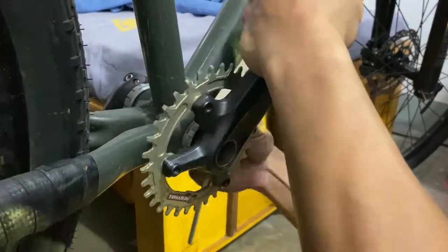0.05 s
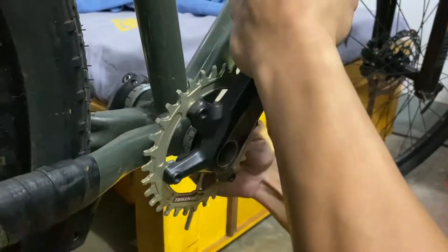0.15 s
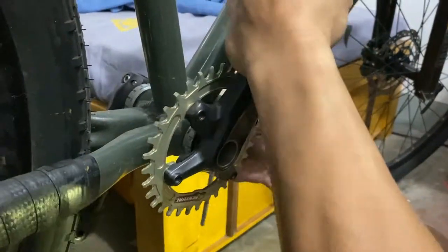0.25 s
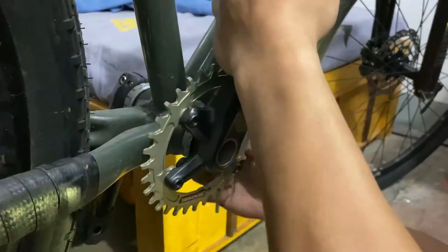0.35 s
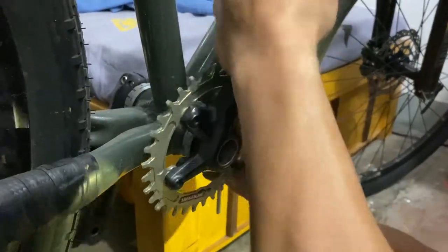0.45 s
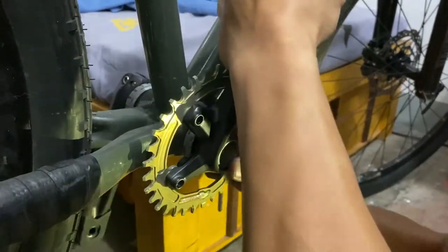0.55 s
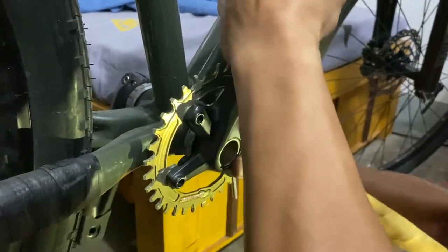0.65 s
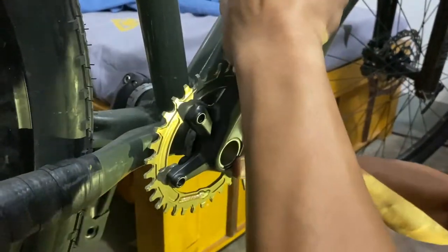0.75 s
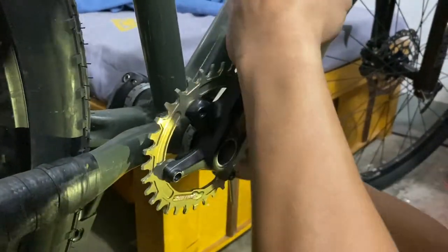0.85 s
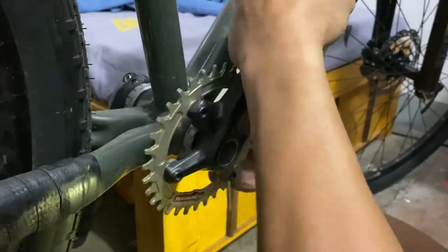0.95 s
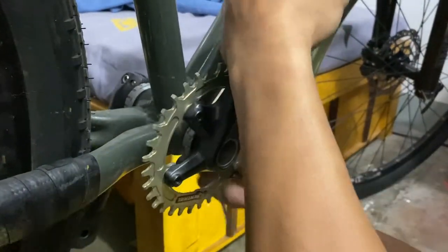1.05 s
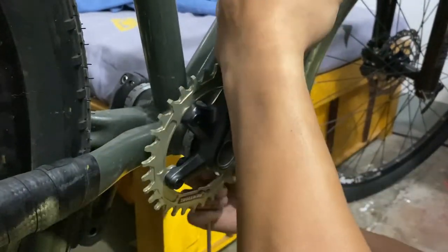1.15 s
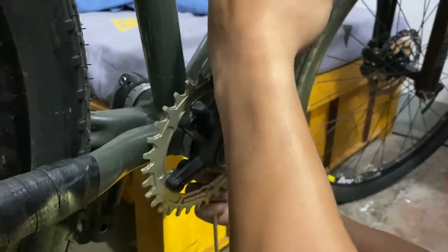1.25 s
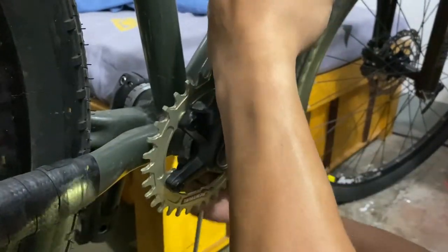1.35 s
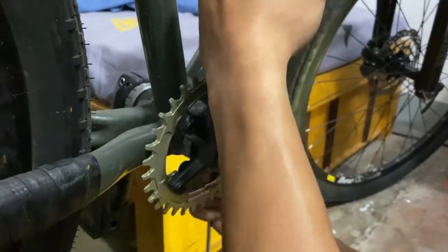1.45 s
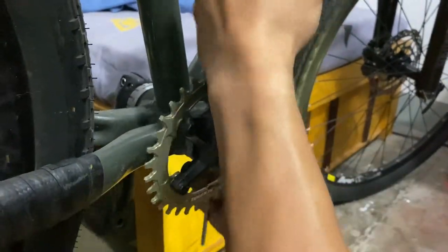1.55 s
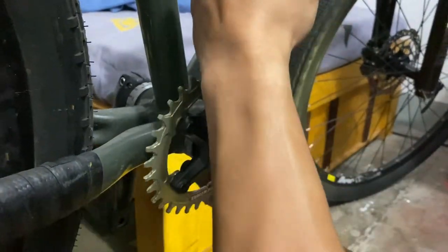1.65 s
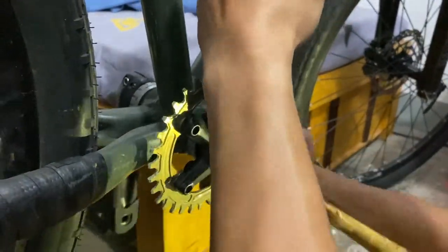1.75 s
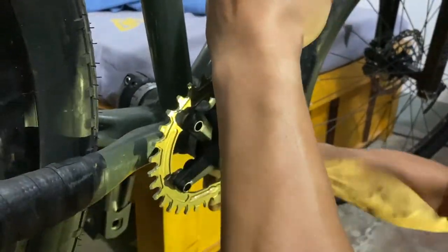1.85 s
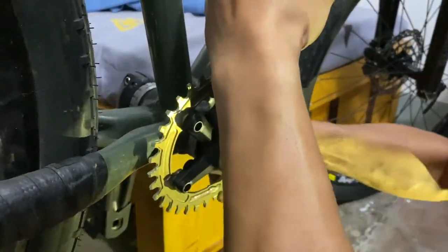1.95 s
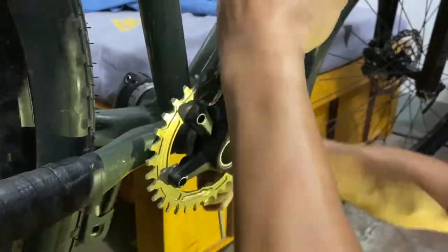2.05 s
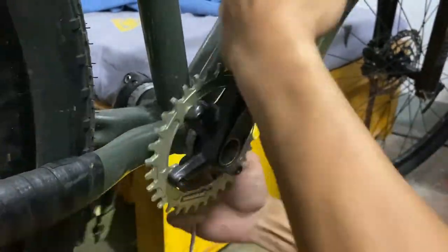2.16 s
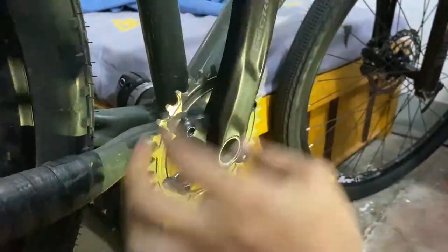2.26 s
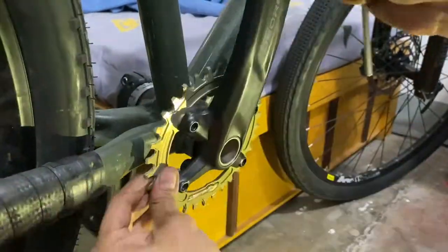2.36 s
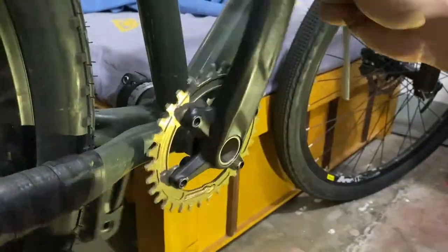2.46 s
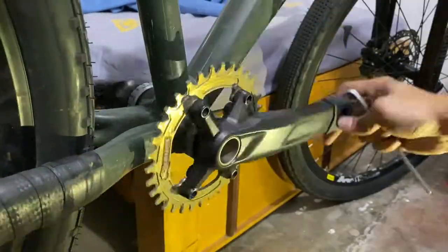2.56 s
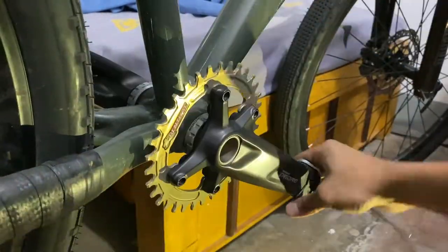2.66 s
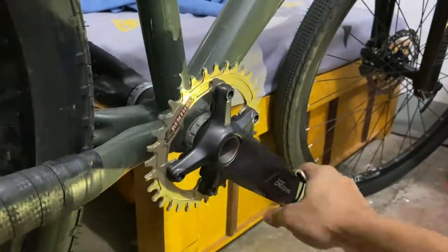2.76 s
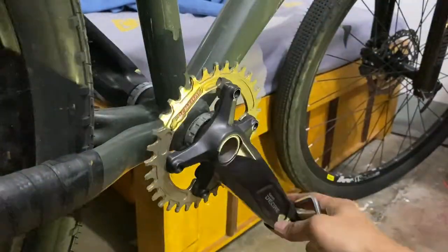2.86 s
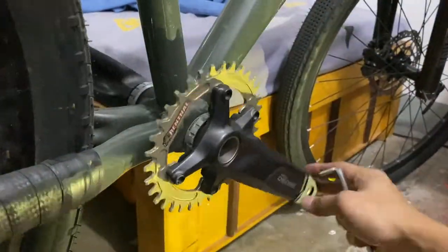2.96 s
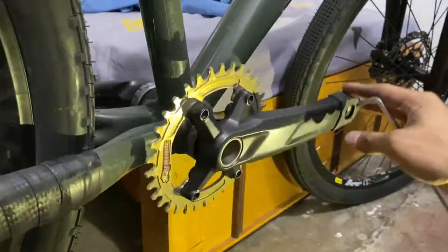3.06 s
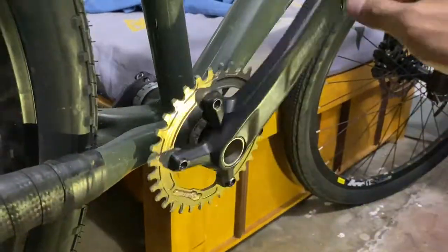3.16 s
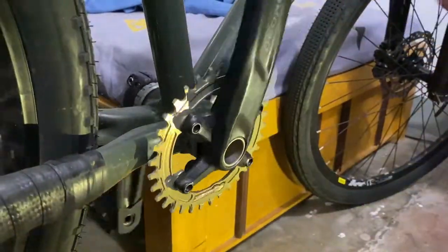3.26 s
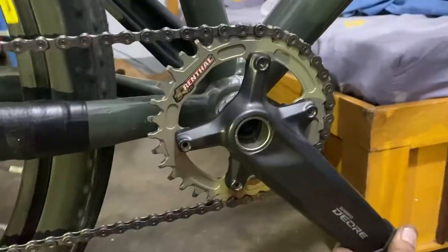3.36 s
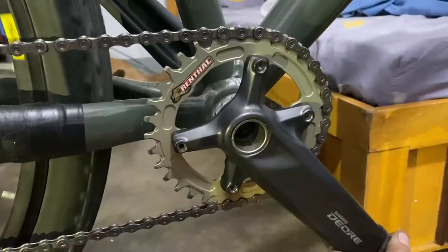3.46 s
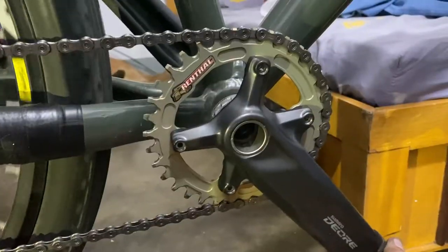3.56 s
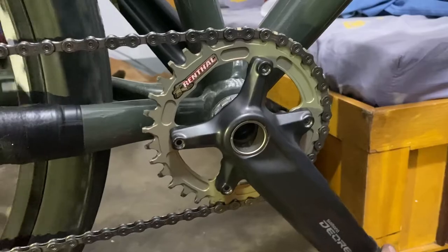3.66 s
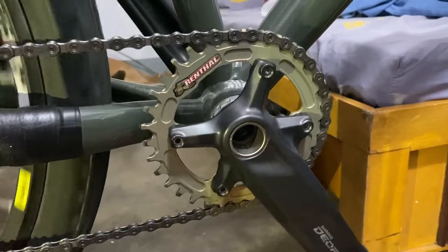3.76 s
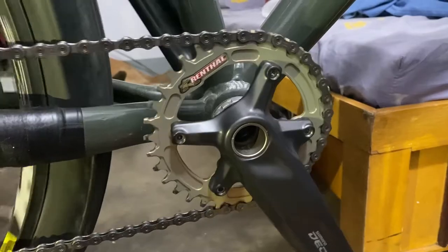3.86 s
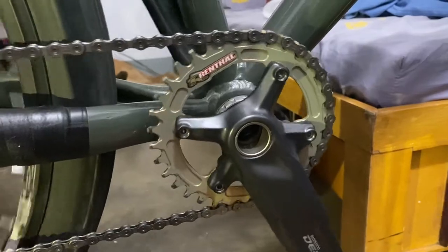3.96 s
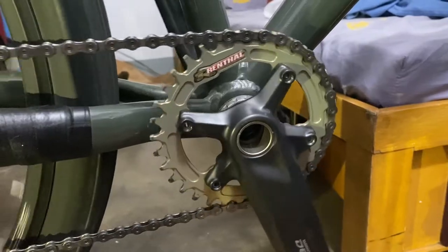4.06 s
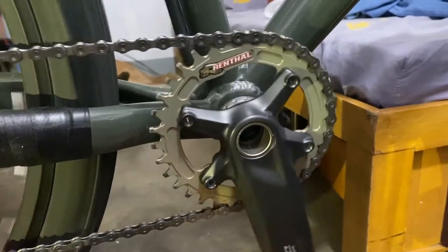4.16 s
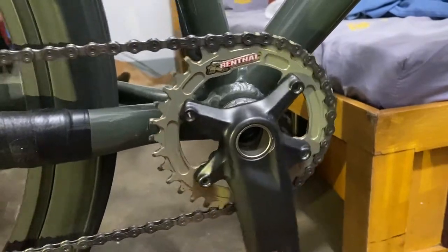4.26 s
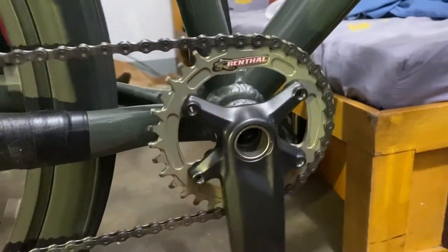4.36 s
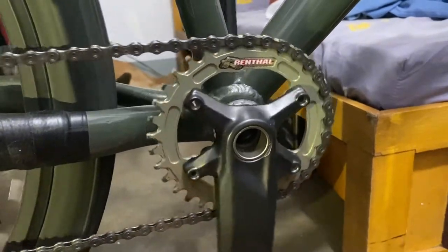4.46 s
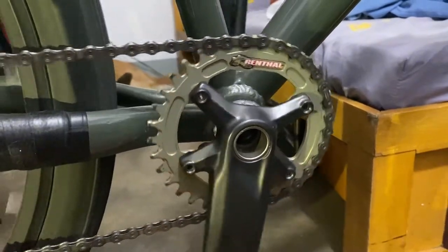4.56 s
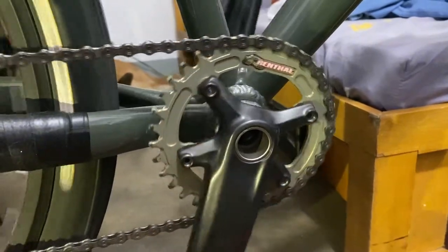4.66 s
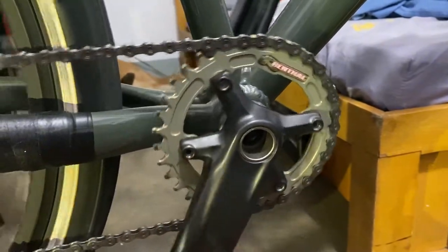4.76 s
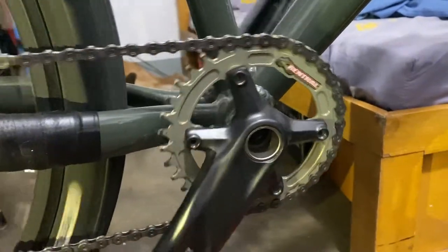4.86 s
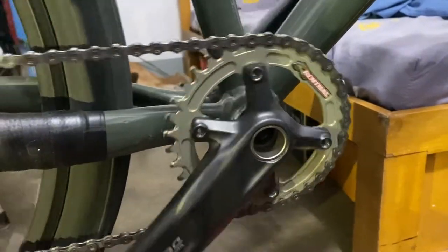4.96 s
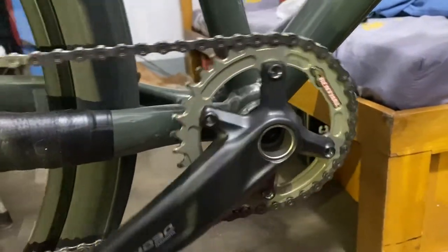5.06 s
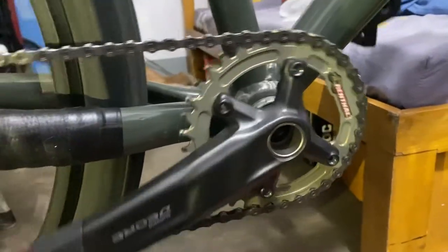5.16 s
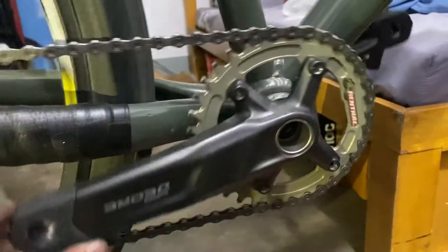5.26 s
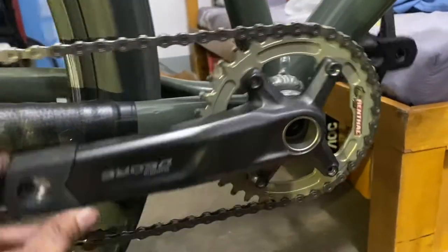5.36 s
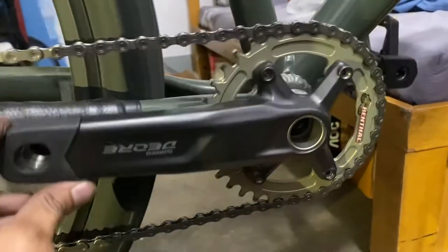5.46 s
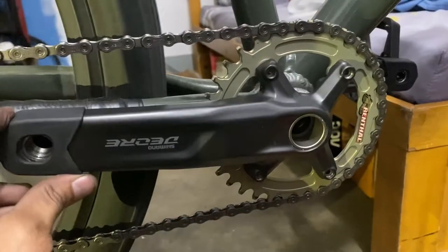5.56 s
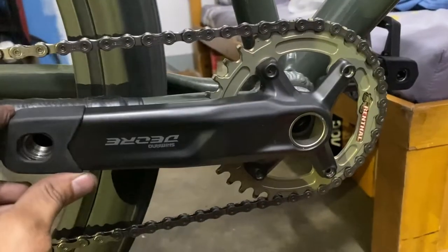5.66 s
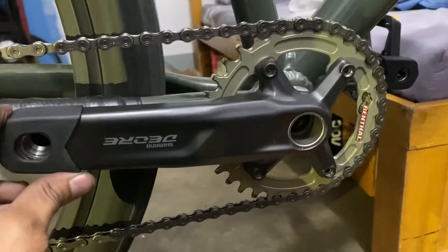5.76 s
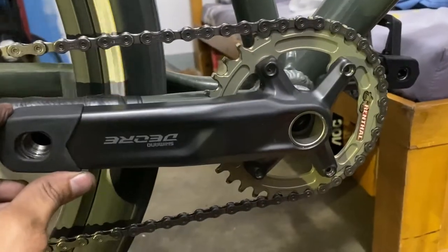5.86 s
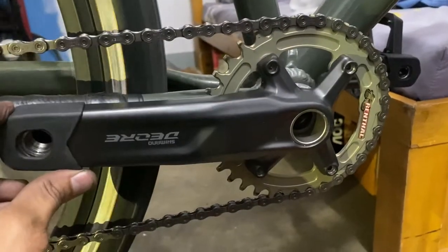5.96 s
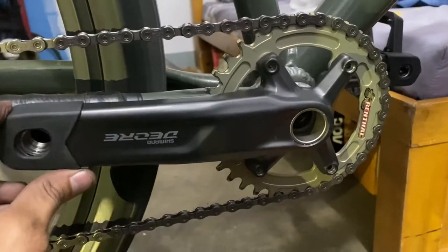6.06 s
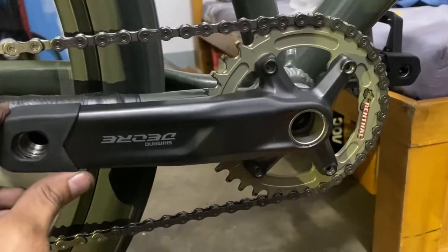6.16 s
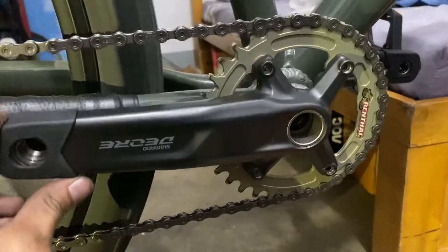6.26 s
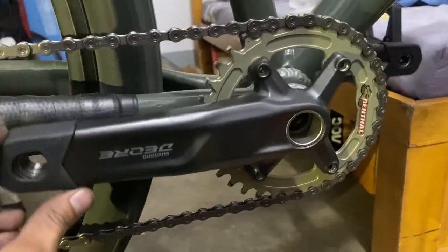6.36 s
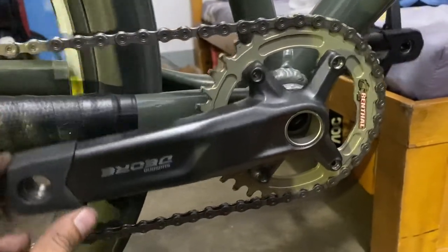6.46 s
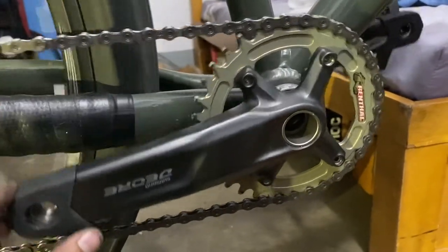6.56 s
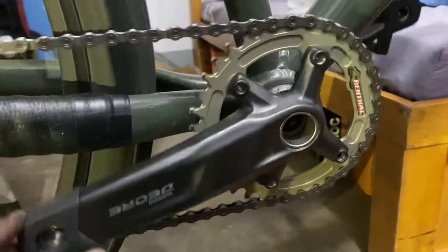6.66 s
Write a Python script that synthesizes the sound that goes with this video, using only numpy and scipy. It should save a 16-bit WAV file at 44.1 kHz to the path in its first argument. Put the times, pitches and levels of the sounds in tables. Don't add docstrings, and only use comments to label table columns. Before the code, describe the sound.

A close stereo pickup in a small, fairly dry room with thin fan hiss and faint tones. Light steel ticks come at 0.1 and 0.4-0.5 s, then a brighter, loud cluster of key knocks at 1.1-1.3 s. Smaller rattles and soft finger rubbing continue from 1.5 to 2.4 s. A dry seal squeaks at 2.45-2.57 s, rising then sagging, and again at 2.74-2.88 s, a low chirp into a higher squeak with rubbing. A soft brush at 3.0 s and a weak groan around 3.17 s precede tiny stutters and a hard cut at 3.33 s. Now a low engine idle and traffic rumble, briefly dipping around 3.7 s. Chain links tick and ring irregularly from 3.7 to 5.4 s, denser after 4.7. From 5.5 s crisp freewheel clicks ring every 0.075 s, quickening after 6.2 to about 0.05 s until 6.7, as chain hiss grows.

```python
import sys
import numpy as np
from scipy import signal
from scipy.fft import rfft, irfft, next_fast_len
from scipy.io import wavfile
from scipy.ndimage import uniform_filter1d, minimum_filter1d

SR = 44100
rng = np.random.default_rng(int(sys.argv[2]) if len(sys.argv) > 2 else 0)


def how_loud(loudness_db):
    steps = np.asarray(loudness_db, float) / 20
    return 10 ** steps


def generate_wav(signal):
    frames = np.transpose(np.atleast_2d(signal))
    scaled = np.clip(frames, -1, 1) * 32767
    pcm = np.round(scaled).astype(np.int16)
    wavfile.write(sys.argv[1], SR, pcm)


N = 296263
T = np.arange(N) / SR

# (frequency [Hz], left-right likeness [-1 to 1])
ROOM_LIKENESS = [(60, 0.89), (130, 0.62), (290, 0.71), (640, 0.87), (1410, 0.66), (3100, -0.021),
                 (6820, -0.32), (15000, 0.046)]


def in_time(rows):
    s, *columns = np.transpose(rows)
    return [np.interp(T, s, c) for c in columns]


def at_hz(points, hz):
    return np.interp(np.log(hz), np.log(np.array(points)[:, 0]), np.array(points)[:, 1])


def rms_one(x):
    return x / np.sqrt(np.mean(x ** 2) + 1e-20)


def drift(rate):
    r = np.exp(-80 * np.pi * rate / SR)
    slow = signal.lfilter([1], [1, -2 * r, r * r], rng.standard_normal(N // 40 + 2002))[2000:]
    return np.interp(np.arange(N) / 40, np.arange(len(slow)), rms_one(slow))


def swell(start, hold, attack, release):
    return np.clip((T - start) / attack, 0, 1) * np.exp(-np.clip((T - start - hold) / release, 0, 50))


def high_pass(x, order, hz):
    return signal.sosfilt(signal.butter(order, hz, "high", fs=SR, output="sos"), x)


def resonance(x, hz, width_hz):
    r = np.exp(-np.pi * width_hz / SR)
    feedback = [1, -2 * r * np.cos(2 * np.pi * hz / SR), r * r]
    return signal.lfilter([(1 - r * r) / 2, 0, (r * r - 1) / 2], feedback, x + 1e-18)


def air(spectrum, likeness, patchy_db):
    size = next_fast_len(N)
    hz = np.maximum(np.fft.rfftfreq(size, 1 / SR), 1)
    mid, side = rfft(rng.standard_normal((2, N)), size)
    alike = np.clip(at_hz(likeness, hz), -1, 1)
    pair = np.sqrt(1 + alike) * mid + np.sqrt(1 - alike) * side * [[1], [-1]]
    lowest_hz, highest_hz = spectrum[0][0], spectrum[-1][0]
    shaped = pair * how_loud(at_hz(spectrum, hz) - 60 * (hz < lowest_hz))
    octave = np.log2(hz / 20)
    out = np.zeros((2, N))
    for k in range(11):
        if lowest_hz / 2 < 20 * 2 ** k < highest_hz * 2:
            band = irfft(shaped * np.clip(1 - abs(octave - k), 0, 1))[:, :N]
            out += band * how_loud(patchy_db * drift(23))
    return rms_one(out)


def placed(x, pan_db, lag):
    return np.array([np.interp(T - lag / SR, T, x), x]) * how_loud(np.array([[.5], [-.5]]) * pan_db)


def room(x):
    # (frequency [Hz], decay time T60 [s])
    room_t60 = [(500, 0.098), (3000, 0.3), (10000, 0.21), (16000, 0.08)]
    size = next_fast_len(N + SR // 2)
    hz = np.maximum(np.fft.rfftfreq(size, 1 / SR), 1)
    out = np.zeros((2, len(hz)), complex)
    for k, lag in enumerate(rng.uniform(.005, .03, 16)):
        echo = how_loud(-60 * lag / at_hz(room_t60, hz)) * np.exp(-2j * np.pi * hz * lag)
        out[k % 2] += (-1) ** (k // 2) * echo / (1 - echo)
    return irfft(out * rfft(x, size), size)[:, :N] / 3


def rattle(lengths, spiky, attack):
    t = np.arange(3500) / SR
    shape = (len(lengths), 3500)
    grains = rng.standard_normal(shape) * np.exp(spiky * rng.standard_normal(shape))
    return grains * (1 - np.exp(-t / attack)) * np.exp(-t / np.clip(lengths, .0003, .012)[:, None])


def struck(bursts, dbs, modes, vary_db):
    strength = how_loud(dbs[:, None] + vary_db * rng.standard_normal((len(dbs), len(modes))))
    return sum((-1) ** k * how_loud(db) * strength[:, [k]] * resonance(bursts, hz, width)
               for k, (hz, width, db) in enumerate(modes))


def levelled(rows, dbs):
    return rows * (how_loud(dbs) / np.sqrt(np.mean(rows[:, :SR // 200] ** 2, axis=1)))[:, None]


def add(out, times, rows):
    for s, row in zip(times, rows):
        span = out[round(s * SR):][:len(row)]
        span += row[:len(span)]
    return out


def ticks(s, peak, middle, low, ring_hz, length, modes, top_db, middle_db, low_db):
    bursts = rattle(length, spiky=0.37, attack=0.0018)
    rows = struck(bursts, peak + top_db, modes[2:], vary_db=2.5)
    rows = rows + struck(bursts, middle + middle_db, modes[:2], vary_db=4.0)
    rings = [how_loud(db + low_db) * resonance(burst, hz, 225) for burst, hz, db in zip(bursts, ring_hz, low)]
    return add(np.zeros(N), s, rows + rings)


def quiet_room():
    # (time [s], level [dB])
    room_level = [(0.0, -66.5), (2.96, -65.5), (3.33, -67.5)]
    # (frequency [Hz], density [dB per Hz])
    room_colour = [(53, -96), (90, -57.5), (330, -11), (368, -10), (568, -14.5), (606, -10.5), (706, -7.5),
                   (858, -14), (935, -15.5), (1090, -19), (1240, -13), (2380, -14.5), (6500, -24.5),
                   (9000, -25.5), (14000, -36), (15100, -34), (16400, -43)]
    # (frequency [Hz], level [dB rms])
    fan_tones = [(382.2, -79.5), (613.7, -72.5), (721.4, -74), (915.2, -73), (1276, -77), (2353, -82.5)]
    level_db, = in_time(room_level)
    tones = np.zeros(N)
    for hz, db in fan_tones:
        level = how_loud(db + 0.77 * drift(4.3)) * np.sqrt(2)
        tones += level * np.sin(2 * np.pi * np.cumsum(hz + 1.58 * drift(3.2)) / SR)
    hiss = how_loud(level_db + 3.5) * air(room_colour, ROOM_LIKENESS, patchy_db=1.05)
    return (hiss + tones) * how_loud([[-1.1], [1.1]])


def street():
    # (time [s], engine load [dB], chain drag [dB])
    effort = [(3.33, -52, -79), (3.51, -58.5, -79.5), (3.73, -66, -80.5), (3.88, -57.5, -73.5),
              (3.99, -50, -78), (4.23, -50.5, -72), (4.8, -50, -70), (5.5, -50, -70.5), (6.22, -50, -66.5),
              (6.72, -49, -60.5)]
    # (frequency [Hz], density [dB per Hz])
    street_colour = [(88, -2.5), (150, -4), (183, -12), (248, -6), (575, -8), (656, -12.5), (1340, -17),
                     (3500, -30.5), (4550, -42), (7700, -120)]
    # (frequency [Hz], density [dB per Hz])
    chain_hiss = [(900, -34), (1500, -6.5), (3300, -11.5), (5600, -16.5), (6500, -16.5), (6950, -11),
                  (7600, -16.5), (8300, -2.5), (9000, -16.5), (11000, -24.5), (12400, -20.5), (13500, -27),
                  (14900, -33), (16000, -49)]
    # (frequency [Hz], left-right likeness [-1 to 1])
    street_likeness = [(60, 0.78), (130, 0.66), (290, 0.43), (640, 0.091), (1410, 0.2), (3100, 0.083),
                       (6820, 0.1), (15000, 0.27)]
    # (frequency [Hz], level [dB])
    firing_orders = [(38.4, -9.5), (76.6, 4), (119.7, -5)]
    # (frequency [Hz], width [Hz], level [dB])
    engine_hums = [(55, 9.7, -5), (70, 19, -13), (93, 7.2, -23), (122.7, 14, -11), (138.3, 3, -10),
                   (214.4, 6.8, -13), (250.8, 26, -10.5), (264, 4, -15), (320.3, 1.4, -16),
                   (383.4, 5.8, -16.5)]
    engine_db, hiss_db = in_time(effort)
    noise_db = -56.5 + 0.085 * (engine_db + 53.0) + 0.16 * (hiss_db + 73.0)
    white = rng.standard_normal(N)
    hums = sum(how_loud(db) * rms_one(resonance(resonance(white, hz, width), hz, 3 * width))
               for hz, width, db in engine_hums)
    firing = sum(how_loud(db + .8 * drift(2.5)) * np.sin(2 * np.pi * hz * T + .3 * drift(1.5))
                 for hz, db in firing_orders)
    engine = how_loud(engine_db - 5.0) * placed(hums + firing, pan_db=-4.0, lag=1.7)
    noise = how_loud(noise_db) * air(street_colour, street_likeness, patchy_db=2.0)
    return engine + noise + how_loud(hiss_db + 3.5) * air(chain_hiss, street_likeness, patchy_db=4.5)


def rubbing():
    # (time [s], hold [s], level [dB])
    strokes = [
        (1.657, 0.13, -61),
        (2.018, 0.22, -74),
        (2.731, 0.16, -56),
        (3.135, 0.04, -62),
    ]
    # (frequency [Hz], density [dB per Hz])
    rub_colour = [(900, -36), (2050, -3.5), (3000, -3.5), (5000, -9.5), (10500, -9), (15500, -7.5),
                  (16500, -5)]
    level = how_loud(-75) * (T > 0.92)
    for s, hold, db in strokes:
        level = level + how_loud(db) * swell(s, hold, attack=0.02, release=0.049)
    hiss = level * how_loud(2.5 * drift(28)) * air(rub_colour, ROOM_LIKENESS, patchy_db=3.5)
    noise = rng.standard_normal(N)
    thud = how_loud(-84.5) * rms_one(resonance(resonance(noise, 162, 36), 162, 46))
    brush = how_loud(-59) * rms_one(resonance(resonance(noise, 681, 520), 681, 500))
    return hiss + (thud + brush) * np.interp(T, [2.95, 3.015, 3.08], [0, 1, 0])


def bolt_key():
    # (time [s], bright level [dB], ring level [dB], ring [Hz], rattle length [s])
    key_ticks = [(0.1082, -56, -72, 2220, .0022), (0.423, -52, -63, 1640, 0.0018),
                 (0.501, -51, -63, 2470, 0.0049), (1.1066, -32.5, -53, 3420, 0.0048),
                 (1.1137, -46, -55, 1770, 0.0034), (1.1458, -24.5, -52, 1730, 0.0016),
                 (1.188, -27.5, -72, 2640, 0.0013), (1.218, -46, -69, 2120, 0.0022),
                 (1.243, -47, -80, 2000, 0.0012), (1.2546, -42.5, -88, 1610, 0.0052),
                 (1.295, -39, -70, 2280, 0.0019), (1.301, -46, -54, 2360, .0027),
                 (1.318, -41, -56, 1600, 0.002), (1.36, -59, -70, 3000, 0.0022),
                 (1.526, -54, -50, 2930, 0.0092), (1.558, -56, -53, 2900, 0.0097),
                 (1.623, -48.5, -52, 2080, 0.0037), (1.685, -49, -53, 2900, 0.0061),
                 (1.694, -71, -50.5, 2050, 0.0073), (1.72, -70, -51, 2060, 0.0043),
                 (1.749, -54, -50, 2720, 0.0041), (1.841, -52, -50, 1800, 0.0027),
                 (1.8826, -48, -45, 2890, 0.0026), (1.908, -54, -57, 2900, 0.0022),
                 (2.041, -44.5, -48.5, 3020, 0.0056), (2.044, -74, -49, 1850, 0.01),
                 (2.0625, -62, -58, 3500, .001), (2.332, -46, -85, 2500, 0.0012),
                 (2.438, -58, -80, 2500, .002), (2.121, -46.5, -57.5, 2390, 0.0084),
                 (2.153, -50, -59, 2850, 0.0022), (2.174, -49, -52, 3100, 0.0028),
                 (2.204, -51.5, -54, 2800, 0.0078), (2.368, -80, -51, 2460, 0.0042),
                 (2.443, -70, -31, 2290, .001), (2.475, -78, -32, 2450, 0.0028),
                 (2.551, -44, -40.5, 2280, 0.0021), (2.788, -60, -45, 2710, 0.00088),
                 (2.728, -36, -49, 1703, 0.0016)]
    # (frequency [Hz], width [Hz], level [dB])
    steel_modes = [(4600, 660, -3), (6800, 1000, 7.5), (10280, 1300, 12), (11450, 920, 13),
                   (14800, 1700, 9.5)]
    s, peak, low, ring_hz, length = np.transpose(key_ticks)
    return ticks(s, peak, 0.66 * peak + 0.43 * low, low, ring_hz, length, steel_modes,
                 top_db=-7.5, middle_db=4.5, low_db=16.5)


def chain():
    # (time [s], bright level [dB], middle level [dB], ring level [dB])
    link_ticks = [(3.682, -53.5, -55, -60), (3.7296, -48, -53, -53), (3.921, -67, -55, -60),
                  (3.952, -52.5, -61, -55.5), (4.0066, -51.5, -86, -70), (4.115, -59, -49.5, -58),
                  (4.472, -72, -54, -62), (4.576, -76, -54, -51), (4.6784, -62, -60, -62),
                  (4.6956, -79, -55, -49), (4.7188, -51, -49, -55), (4.798, -53, -58, -44),
                  (4.808, -48, -62, -67), (4.9187, -60, -62, -61), (4.956, -55, -54, -50),
                  (5.0004, -51, -55, -61), (5.015, -45, -62, -59), (5.03, -48, -54, -59.5),
                  (5.0898, -46, -62, -77), (5.137, -54, -71, -75), (5.152, -43.5, -44, -48),
                  (5.275, -49, -67, -59), (5.356, -52, -61, -55), (5.3775, -49, -49, -59)]
    # (frequency [Hz], width [Hz], level [dB])
    link_modes = [(4100, 3200, 3), (6950, 170, 9.5), (7500, 1700, 5), (11800, 3100, 6), (15200, 1800, 4)]
    s, peak, middle, low = np.transpose(link_ticks)
    spread = rng.standard_normal((len(s), 2))
    ring_hz = 1866 * (1 + 0.065 * spread[:, 0])
    length_s = 0.0024 * how_loud(2 * spread[:, 1])
    return ticks(s, peak, middle, low, ring_hz, length_s, link_modes, top_db=0.0, middle_db=5.0, low_db=22.5)


def plates():
    # (time [s], peak level [dB], ring [Hz])
    plate_rings = [(3.682, -57, 3100), (3.73, -50, 6360), (3.7804, -58, 3220), (3.9215, -53, 3470),
                   (3.954, -59, 6500), (4.1157, -51, 5240), (4.163, -51, 2980), (4.189, -56.5, 6800),
                   (4.3127, -59, 3460), (4.4284, -58, 4400), (4.4723, -59, 3480), (4.5302, -55, 4820),
                   (4.5766, -48, 5430), (4.5775, -53, 3700), (4.6594, -53, 3800), (4.679, -58, 5160),
                   (4.6798, -55, 2600), (4.6963, -52, 4900), (4.7223, -43.5, 4440), (4.742, -55, 4500),
                   (4.7963, -44, 4900), (4.808, -41, 4770), (4.809, -46, 3300), (4.809, -54, 7500),
                   (4.825, -67, 4400), (4.917, -49, 2800), (4.956, -45, 4700), (4.9563, -44, 3100),
                   (5.0016, -53, 4200), (5.0308, -49, 5010), (5.032, -48, 3170), (5.0954, -63, 3060),
                   (5.1358, -56, 3500), (5.1515, -40, 6800), (5.153, -56, 3730), (5.276, -51, 3100),
                   (5.3245, -56, 3010), (5.355, -56, 4100), (5.375, -52, 3600)]
    s, peak, ring_hz = np.transpose(plate_rings)
    bursts = rattle(np.full(len(s), .0022), spiky=0.8, attack=0.001)
    rows = []
    for burst, hz, db in zip(bursts, ring_hz, peak):
        ring = resonance(burst, hz, 265) + 0.19 * resonance(burst, 1.52 * hz, 450)
        rows.append(how_loud(db + 9.5) * ring)
    return add(np.zeros(N), s - .0007, rows)


def squeak():
    # (time [s], hold [s], level [dB], sharpness [dB per partial], scrape level [dB])
    slips = [(2.445, 0.012, -47.5, 4, -71), (2.462, 0.0072, -51, -10, -65), (2.475, 0.015, -47, 5, -55),
             (2.493, .012, -50, -8, -94), (2.507, 0.0087, -35, 8, -54), (2.5152, 0.006, -38, 11, -26),
             (2.521, 0.002, -32, 3.5, -34), (2.525, 0.023, -46, -4, -87), (2.554, 0.0088, -45, -14, -57),
             (2.735, 0.0092, -43, 4.5, -70), (2.75, 0.0061, -54, -1, -75.5), (2.7588, 0.0047, -46, 3, -74),
             (2.765, 0.012, -46.5, -3.5, -72), (2.7967, 0.0069, -43.5, 16, -33.5),
             (2.804, 0.0079, -37, 6.5, -27.5), (2.813, 0.0088, -38, 7, -67), (2.827, 0.0088, -45, 6, -87),
             (2.835, 0.0096, -43.5, 10.5, -62), (2.848, 0.0088, -37, 1, -68),
             (2.861, 0.0061, -48, -20, -59), (2.872, 0.0051, -56, -17, -66), (3.157, 0.013, -54, -22, -65),
             (3.172, 0.018, -49.5, -1.5, -52.5), (3.187, 0.017, -46.5, -1, -70)]
    # (time [s], slip rate [Hz])
    slip_rate = [
        [(2.445, 816), (2.456, 835), (2.477, 1010), (2.5, 914), (2.509, 1222), (2.517, 1439), (2.525, 1389),
         (2.543, 668.5), (2.57, 572)],
        [(2.735, 861), (2.748, 840), (2.756, 864), (2.761, 1008), (2.766, 912), (2.771, 880), (2.778, 906),
         (2.787, 893)],
        [(2.797, 1137), (2.806, 1222), (2.821, 1167), (2.827, 1136), (2.833, 982), (2.838, 1123), (2.858, 1148),
         (2.867, 944), (2.882, 910)],
        [(3.157, 949), (3.176, 701), (3.196, 898), (3.215, 853)],
    ]
    # (frequency [Hz], gain [dB])
    arm_gain = [(700, 3), (1300, -4), (1700, -3), (2400, 0), (2850, 0), (3300, -42), (3600, -17.5),
                (4300, -12)]
    # (frequency [Hz], level [dB])
    seal_bright = [(2650, -35), (4500, -6), (7220, -25), (8500, -15), (9700, -11.5), (11000, -11.5),
                   (12100, -24), (13200, -33), (16000, -29)]
    hz, = in_time(np.concatenate(slip_rate))
    shapes = np.array([swell(s, hold, attack=0.0021, release=0.0029) for s, hold, *_ in slips])
    _, _, level_db, sharp_db, scrape_db = np.transpose(slips)
    phase = 2 * np.pi * np.cumsum(hz * (1 + 0.0024 * drift(220))) / SR

    def partial(k):
        return np.sin(k * phase + k * k)

    low = np.zeros(N)
    for k in range(3):
        level = how_loud(level_db + k * sharp_db + 2.0) @ shapes
        gain_db = at_hz(arm_gain, (k + 1) * hz) - 7.5 * (k == 2)
        low += level * how_loud(gain_db) * np.sin((k + 1) * phase + k * k)

    buzz = sum(how_loud(db) * partial(k) for k, db in enumerate([-18, -15, -19.5], start=4))
    buzz = np.clip((990 - hz) / 100, 0, 1) * buzz
    low = low + how_loud(level_db + np.minimum(sharp_db, 0)) @ shapes * buzz * how_loud(3.0 * drift(300))

    high = np.zeros(N)
    smoothing_db = 45 * 2 * np.maximum(hz / 1230 - 1, 0)
    for k in range(4, 14):
        loss_db = smoothing_db * np.exp(-((k - 8.2) / 1.2) ** 2)
        high += how_loud(at_hz(seal_bright, k * hz) - loss_db) * (k * hz < 16000) * partial(k)

    scrape_band = signal.butter(2, [2600, 15500], "band", fs=SR, output="sos")
    hiss = rms_one(signal.sosfilt(scrape_band, rng.standard_normal(N)))
    hiss = hiss + 4.7 * resonance(hiss, 3200, 2300)
    tonal = np.clip((scrape_db + 60) / 12, 0, 1)
    top = (how_loud(scrape_db - 1.5) * tonal) @ shapes * high
    top = top + (how_loud(scrape_db - 6.0) * (1 - 0.994 * tonal)) @ shapes * hiss
    low = low * (1 + 0.045 * resonance(rng.standard_normal(N), 420, 820) * 4)
    return high_pass((low + top) * how_loud(drift(130)), 4, 420)


def freewheel():
    # (time [s], level [dB], bounce length [s], firmness of the lower modes [dB])
    pawl_drops = [(5.5154, -32, 0.0043, 2), (5.587, -31.5, 0.005, 1), (5.661, -29, 0.0035, 1.5),
                  (5.7353, -29.5, 0.0035, -1), (5.81, -30.5, 0.0043, 0.5), (5.8842, -29, .003, -1.5),
                  (5.96, -28, 0.00066, 2.5), (6.033, -28.5, 0.0021, 0), (6.109, -28.5, 0.0016, 0.5),
                  (6.1804, -31.5, 0.0052, -1), (6.247, -31, 0.005, -1.5), (6.3098, -30, 0.0034, 1.5),
                  (6.3677, -27, 0.00056, 4), (6.4164, -27.5, 0.003, -1.5), (6.466, -30, 0.0028, 1),
                  (6.5132, -31.5, 0.0028, 1), (6.5606, -32, 0.0036, -2), (6.608, -30.5, 0.0045, 0.5),
                  (6.6563, -31, 0.0035, 0.5), (6.7054, -34, 0.0055, 1)]
    # (frequency [Hz], width [Hz], level [dB])
    hub_low = [(1850, 71, 2), (2210, 130, 0.5), (2890, 89, -2), (3150, 140, -3.5), (3600, 170, -5)]
    hub_middle = [(4700, 240, -1), (5400, 220, -10), (5760, 260, -7), (6750, 97, 4), (7560, 360, -7)]
    hub_top = [(9930, 580, -0.5), (10330, 310, 0), (10490, 180, 2), (10900, 540, -1.5), (11960, 350, -6),
               (12340, 130, -2), (13480, 130, -2), (13140, 1100, -8), (13500, 700, -9.5),
               (15150, 520, -6.5), (16400, 260, -7)]
    flange_modes = [(8400, 330, 1), (9040, 300, -7.5)]
    crack_modes = [(2600, 9300, -8.5), (5700, 18000, -14), (11600, 3200, -14), (14800, 6000, -2.5)]
    flange_db = [-3.5, -1.5, -4, -6.5, -3.5, -6, -8.5, -8.5, -5, -4.5, -4, -5, -6, -7, -7.5, -4.5, -1, -3.5,
                 -5, -6]
    s, level_db, length, firm_db = np.transpose(pawl_drops)
    even = 0 * s
    bursts = rattle(length, spiky=0.28, attack=0.0004)
    snap = rattle(0.67 * length, spiky=0.2, attack=0.00055)
    steady_db = level_db.mean() + firm_db
    rows = levelled(struck(bursts, even, hub_top, vary_db=1.0), level_db + 1.0)
    rows = rows + levelled(struck(bursts, even, flange_modes, vary_db=2.0), level_db + flange_db + 2.5)
    rows = rows + levelled(struck(snap, even, hub_middle, vary_db=7.5), steady_db - 18.0)
    rows = rows + levelled(struck(snap, even, hub_low, vary_db=1.5), steady_db - 22.0)
    crack = struck(rattle(4.2 * length, spiky=0.25, attack=0.0019), even, crack_modes, vary_db=-1.0)
    return add(np.zeros(N), s, rows), add(np.zeros(N), s, levelled(crack, level_db - 13.5))


def scene():
    # (start [s], end [s])
    dropouts = [
        (3.2895, 3.2925),
        (3.299, 3.304),
        (3.309, 3.3155),
        (3.3205, 3.329),
    ]
    # (frequency [Hz], left minus right [dB])
    hub_balance = [(1900, -4), (2500, -1), (3400, 2), (4000, 0), (5500, 3.5), (7200, -7), (7900, -3),
                   (8300, -5), (9000, -1.5), (10000, 0.2)]
    # (frequency [Hz], lead of the left port [rad])
    hub_lead = [(0, -1.5), (2000, -1.5), (2500, .3), (3200, 1.2), (3700, 2.7), (4100, 5.3), (4700, 6),
                (5400, 9.1), (5700, 11.9), (7000, 12.6), (7600, 11.9), (8000, 8.9), (8700, 8.9),
                (9200, 8.2), (10800, 6.3), (11500, 6), (12300, 4.3), (13400, 3.14), (15300, .3),
                (16100, .3)]
    # (frequency [Hz], common share [0 to 1])
    ports_share = [(5000, 0), (6500, .9), (16000, .95)]
    seal = squeak()
    pawls, crack = freewheel()
    key = bolt_key()
    links = chain() + plates()

    first = placed(seal, pan_db=-9.5, lag=4.4) + placed(key, pan_db=-1.0, lag=-0.84)
    first = first + quiet_room() + rubbing()
    first = first + room(how_loud(-53) * seal + how_loud(-16.5) * key)
    first = high_pass(first, 3, 110)

    size = next_fast_len(N)
    hz = np.maximum(np.fft.rfftfreq(size, 1 / SR), 1)
    left_port = how_loud(at_hz(hub_balance, hz)) * np.exp(1j * np.interp(hz, *np.transpose(hub_lead)))
    hub = np.array([irfft(rfft(pawls, size) * left_port, size)[:N], pawls])
    second = placed(links + crack, pan_db=-2.5, lag=-1.7) + street()
    second = second + room(how_loud(-4) * links + how_loud(-7.0) * pawls + how_loud(-2.5) * crack)
    left, right = rfft(second, size)
    share = at_hz(ports_share, hz)
    shared_left = irfft(share * left_port * right + np.sqrt(1 - share ** 2) * left, size)[:N]
    second = hub + [shared_left, second[1]]

    gate = 1 - 0.93 * sum((T > start) & (T < end) for start, end in dropouts)
    return np.where(T < 3.329, first * uniform_filter1d(gate, size=30), second)


def starve(x):
    hz, _, cells = signal.stft(x, SR, nperseg=512)
    power = uniform_filter1d(np.mean(abs(cells) ** 2, axis=0), size=2, axis=0)
    treble = power[hz > 7500].max(axis=0)
    lasting = minimum_filter1d(uniform_filter1d(treble, size=3), size=5)
    in_range = ((hz > 3000) & (hz < 14200))[:, None]
    weak = (power < lasting * how_loud(2 * -20)) & in_range
    return signal.istft(cells * (1 - weak), SR, nperseg=512)[1][:, :N]


def low_pass(x):
    return signal.sosfilt(signal.butter(12, 16810, fs=SR, output="sos"), x)


def record(dry):
    cut = signal.sosfilt(signal.cheby2(10, 50, 16550, fs=SR, output="sos"), dry)
    return low_pass(starve(cut))


dry = scene()
out = record(dry)
generate_wav(out)
```